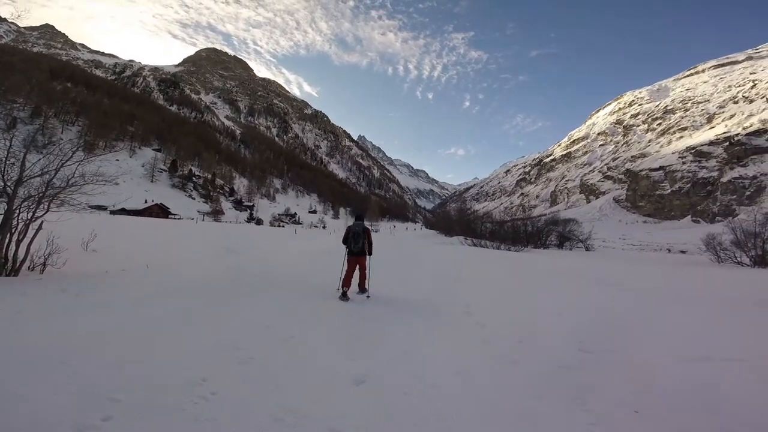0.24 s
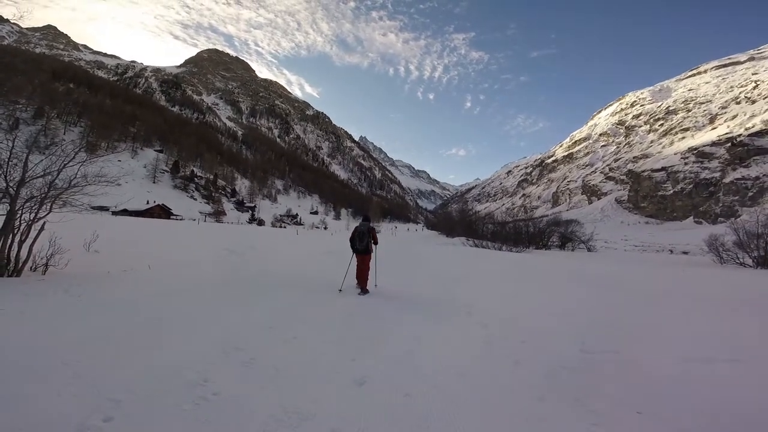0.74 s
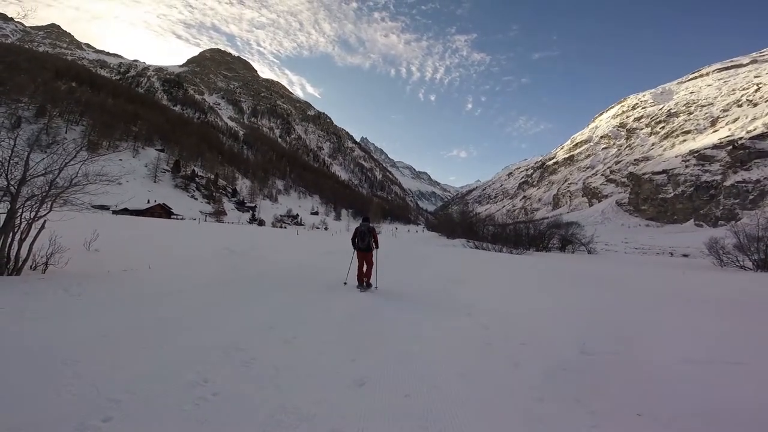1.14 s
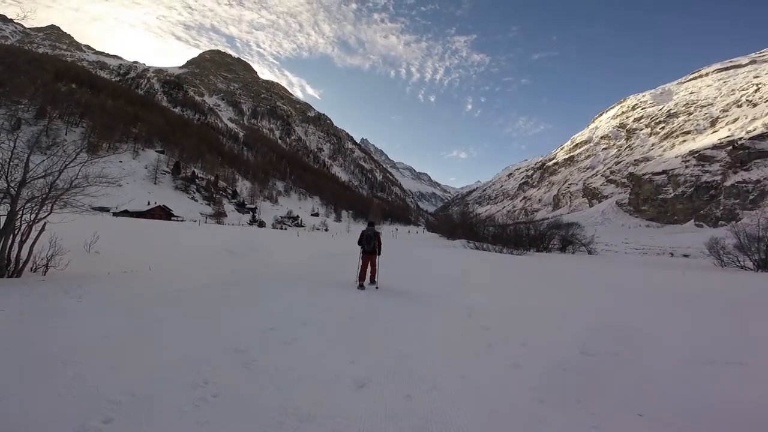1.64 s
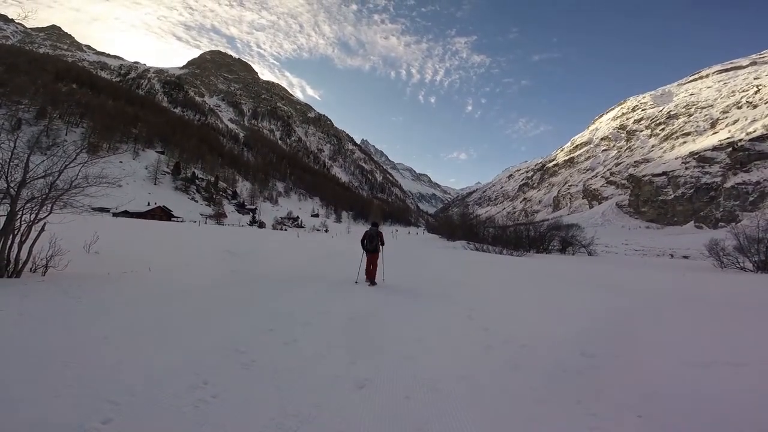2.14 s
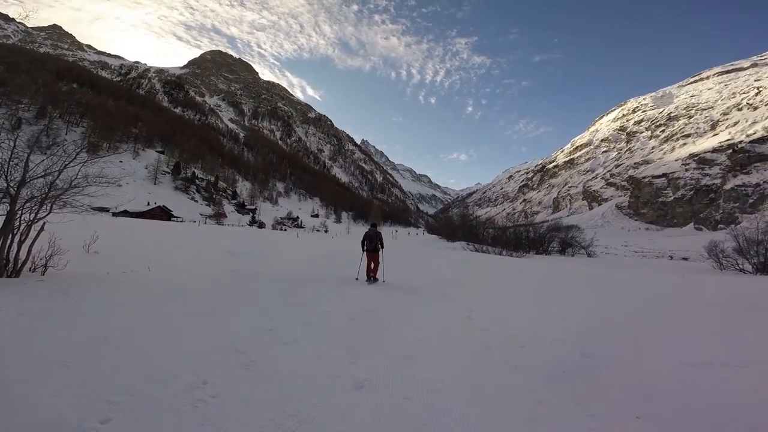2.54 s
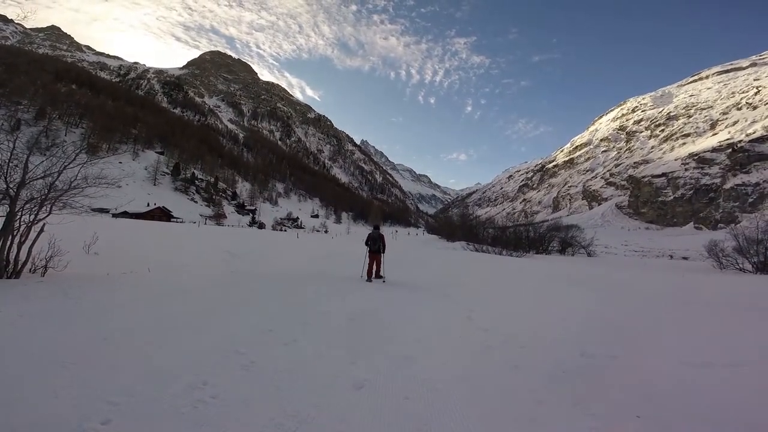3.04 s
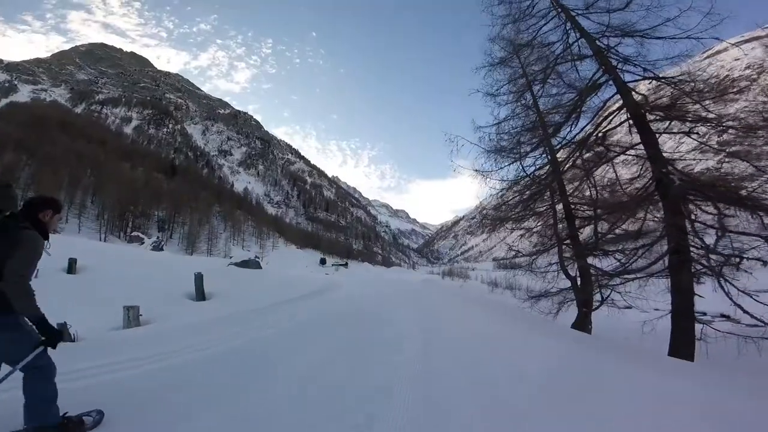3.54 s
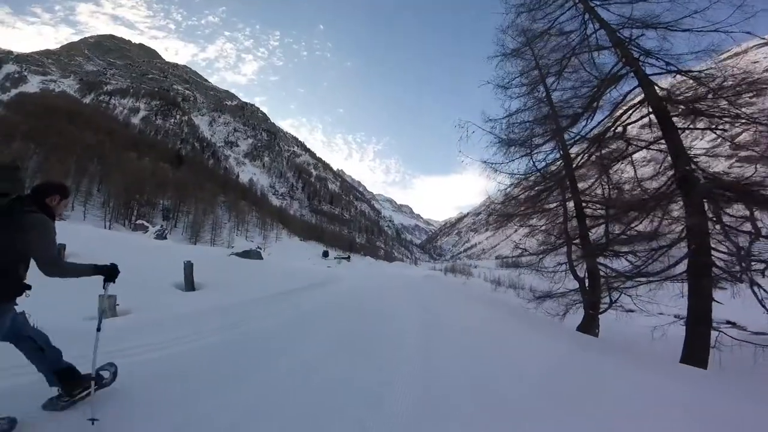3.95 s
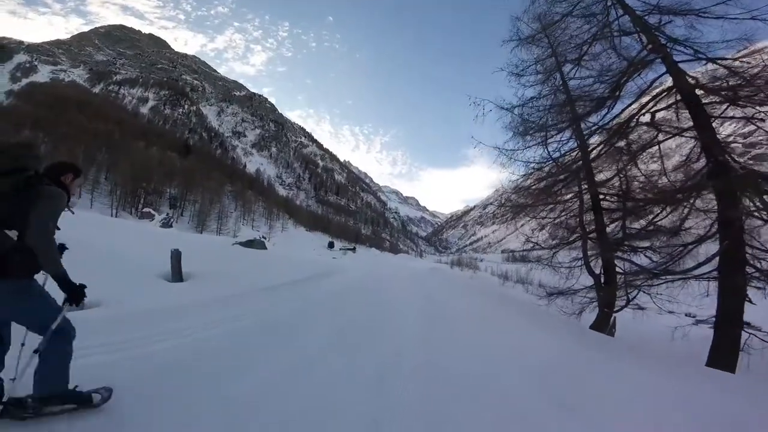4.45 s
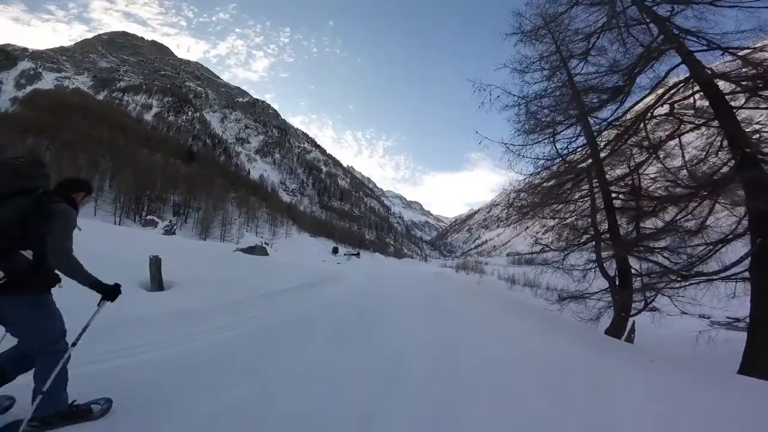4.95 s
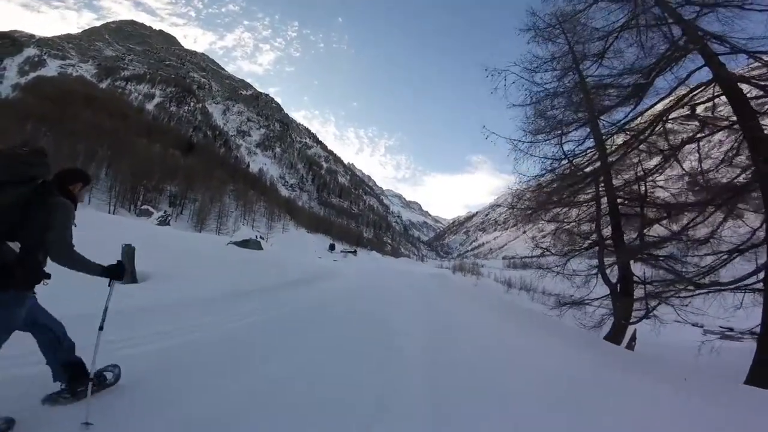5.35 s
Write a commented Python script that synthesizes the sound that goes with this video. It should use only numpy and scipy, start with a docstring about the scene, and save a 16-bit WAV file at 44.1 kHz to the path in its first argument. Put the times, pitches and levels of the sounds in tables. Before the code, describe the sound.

Outdoors on open packed snow, light snowshoe steps crunch and crackle at a slow walking pace, with pole snaps, claw scrapes and tiny icy ticks. Just after three seconds the sound cuts to heavy, coarse steps very near the microphone, with hollow cracks, bursting clods and a low puff of wind that soon fades. Dry, no echo, over a faint airy hiss.

```python
"""Light, crisp snowshoe steps with poles on packed snow; from about 3.2 s the steps are close and heavy.
Each tread is a swarm of filtered random clicks over hiss: coarse fractures crunch, fine ones crackle.
Frames and pole tips break the crust in short bursts; in the light steps claws scrape it.
Under it lies faint air (coloured noise); with the close steps a puff of low wind noise fades to a breeze."""
import sys
import numpy as np
from scipy import signal
from scipy.fft import rfft, irfft, next_fast_len
from scipy.io import wavfile

SR = 44100
rng = np.random.default_rng(int(sys.argv[2]) if len(sys.argv) > 2 else 0)


def wrap_up_sound(samples):
    """Save the sound to the file named by the first command line argument, as 16-bit audio."""
    columns = np.atleast_2d(samples).T
    # keep every value between -1 and 1, then stretch to whole-number steps
    tamed = np.clip(columns, -1, 1)
    steps = np.round(tamed * 32767).astype(np.int16)
    wavfile.write(sys.argv[1], SR, steps)


N = 247401
TIME_S = np.arange(N) / SR

# Spectra, relative: freq_hz, density_db (per Hz)
# still air of the valley
AIR_SPECTRUM = [(25, -13), (112, -25), (135, -7.5), (190, 4), (320, -13), (600, -8), (1900, -14.5),
                (4100, -26), (5500, -38), (6800, -19), (11500, -29.5), (15000, -36)]
# wind
WIND_SPECTRUM = [(15, -38), (35, -2.5), (120, -14), (200, -11), (600, -74)]
# one fracture, light steps
LIGHT_FRACTURE_SPECTRUM = [(150, 4.5), (290, -6.5), (480, -2.5), (850, -8.5), (1700, -9.5), (2700, -9.5),
                           (4300, -18), (5100, -5.5), (5700, -3.5), (6100, -13), (7000, -17.5),
                           (10200, -27.5), (11600, -50), (15000, -69)]
# one fracture, close steps
CLOSE_FRACTURE_SPECTRUM = [(100, -26.5), (160, 0), (400, -7.5), (800, -5.5), (1550, -9.5), (2700, -18),
                           (4450, -27.5), (5600, -12.5), (6700, -15), (7800, -24.5), (9400, -27),
                           (11400, -42.5), (15000, -51)]

# Levels of steps, snaps and scrapes are force levels; snaps() and scrapes() add coarse and fine offsets.
# light steps: full_weight_s, landing_db, full_weight_db
LIGHT_TREADS = [(0.24, -47, -39), (0.945, -52, -41.5), (1.64, -51.5, -43), (2.39, -57, -47),
                (3.06, -87, -43)]
# close steps: full_weight_s, landing_db, full_weight_db, push_off_db
CLOSE_TREADS = [(3.41, -35, -31.5, -70), (4.015, -31, -32, -39.5), (4.625, -34, -31.5, -39.5),
                (5.26, -36.5, -30, -38)]
# light phases (landing, full weight): after_full_weight_s, rise_s, fall_s, crackle_over_crunch_db
LIGHT_PHASES = [(-0.205, 0.056, 0.17, 5), (0, 0.062, 0.05, -2.5)]
# close phases (landing, full weight, push-off): after_full_weight_s, rise_s, fall_s, crackle_over_crunch_db
CLOSE_PHASES = [(-0.135, 0.048, 0.065, -8), (0, 0.11, 0.088, -11.5), (0.175, 0.11, 0.078, -9.5)]
# frame or pole tip breaks the crust, light: start_s, level_db, length_s
LIGHT_CRUST_SNAPS = [(0.035, -38.5, 0.018), (0.234, -43.5, .018), (0.3404, -39.5, 0.0095),
                     (0.4497, -36.5, 0.0071), (0.5393, -36, 0.0058), (0.6026, -35, 0.019),
                     (0.6845, -35.5, 0.011), (0.7305, -35, 0.003), (0.776, -39, 0.014),
                     (0.9402, -39.5, 0.0091), (1.1485, -38.5, 0.019), (1.313, -34.5, 0.023),
                     (1.430, -39.5, 0.018), (1.774, -45, 0.014), (1.9895, -42, 0.017), (2.1445, -41, 0.012),
                     (2.204, -41.5, 0.023), (2.2795, -41.5, 0.027), (2.400, -41.5, 0.0058),
                     (2.6145, -41, 0.0064), (2.7365, -37, 0.013), (2.9795, -39, 0.015), (3.112, -46, 0.052)]
# frame or pole tip breaks the crust, close: start_s, level_db, length_s, crackle_over_crunch_db
CLOSE_CRUST_SNAPS = [(3.2047, -33.5, 0.045, -21), (3.2318, -22.5, 0.0053, -12),
                     (3.2722, -26.5, 0.0092, -14), (3.322, -33.5, 0.05, -21), (3.546, -28.5, 0.0046, -17),
                     (3.65, -46.5, 0.15, -4), (3.6976, -29, 0.016, -20), (3.7472, -30.5, 0.027, -15),
                     (3.7833, -29.5, 0.02, -11), (3.8222, -29, 0.0073, -12), (3.8498, -18.5, 0.0061, -11.5),
                     (4.004, -30, 0.036, -9), (4.2204, -49, 0.02, 11), (4.278, -28, 0.016, -11.5),
                     (4.3119, -31, 0.01, -11), (4.3353, -25.5, .009, -17.5), (4.3812, -29.5, 0.016, -12),
                     (4.4365, -23.5, 0.019, -14), (4.4588, -24.5, 0.006, -6.5), (4.5113, -14, 0.0024, -8),
                     (4.5742, -43.5, 0.12, -2), (4.6873, -27, 0.012, -16.5), (4.752, -36.5, 0.012, -24),
                     (4.8985, -27.5, 0.012, -15), (4.9508, -30, 0.01, -14), (4.9886, -31.5, 0.032, -4.5),
                     (5.0275, -28.5, 0.011, -15), (5.0624, -32.5, 0.054, -7.5), (5.243, -32.5, 0.011, -21),
                     (5.3026, -31, 0.029, -18), (5.5281, -29, .014, -11), (5.5681, -27, 0.02, -16)]
# claws scrape the icy surface, mostly treble: middle_s, level_db, half_length_s
CLAW_SCRAPES = [(0.071, -54, .003), (0.446, -42, 0.017), (0.47, -41.5, .005), (0.5945, -34.5, 0.0046),
                (0.623, -36, 0.0031), (0.807, -30.5, 0.0016), (1.056, -43.5, 0.014), (1.187, -38.5, 0.0015),
                (1.29, -41, 0.017), (1.39, -40, 0.005), (1.4105, -33, 0.0029), (1.498, -35, 0.003),
                (1.867, -45, 0.019), (1.921, -43.5, 0.0034), (1.969, -41.5, 0.013), (2.016, -42, 0.0037),
                (2.13, -41.5, 0.011), (2.165, -43, 0.0048), (2.447, -44.5, .025), (2.528, -45, 0.013),
                (2.657, -45.5, 0.0098), (2.789, -43, .013), (2.908, -39.5, .011), (2.975, -45, 0.086)]

CLOSE_FROM_S, TAKEOVER_S = 3.205, 0.0015
EDGE_HZ = 15300
PUFF_DB, PUFF_FADE_DB_PER_S, BREEZE_DB = -38.5, 16, -61  # wind at the microphone
PHASE_SHAPE = 1.22  # 1 = pointed swell, 2 = rounded
CRACKLE_LAG_S = 0.0048  # fine grains keep slipping after the lumps have given way
SWELL_SHARE = 0.076  # part of a snap's length added to its build-up time
CRUNCH_TOP_HZ, CRACKLE_FROM_HZ = 1600, 4500


def gain_of(db):
    """Decibels to amplitude."""
    return 10 ** (np.asarray(db) / 20)


def evened(x):
    """Scales to rms 1."""
    return x / np.sqrt(np.mean(x ** 2) + 1e-20)


def band(x, lo_hz, hi_hz):
    """Keeps one band, with edges that add up flat to its neighbours."""
    size = next_fast_len(N + SR // 4)
    hz = np.fft.rfftfreq(size, 1 / SR)

    def below(edge_hz):
        return 1 / (1 + (hz / edge_hz) ** 12)

    return irfft(rfft(x, size) * (below(hi_hz) - below(lo_hz)), size)[:N]


def low_cut(x, hz, order):
    """Small, dry sources radiate little bass."""
    return signal.sosfilt(signal.butter(order, hz, "highpass", fs=SR, output="sos"), x)


def colour(x, spectrum, size=4096):
    """Minimum-phase filter with the given spectrum: each click starts sharply and rings briefly."""
    hz, db = np.transpose(spectrum)
    bin_hz = abs(np.fft.fftfreq(size, 1 / SR))
    log_gain = np.log(gain_of(np.interp(np.log(bin_hz + 1), np.log(hz), db)))
    ring = np.fft.ifft(np.exp(np.conj(signal.hilbert(log_gain)))).real
    return signal.oaconvolve(x, ring[:size // 2])[:N]


def wander(rate_hz):
    """Smooth chance of rms 1, up to the given rate."""
    return evened(band(rng.standard_normal(N), 1, rate_hz))


def air(level_db):
    """Still air: an even, faint rush of coloured noise."""
    return gain_of(level_db) * evened(colour(rng.standard_normal(N), AIR_SPECTRUM))


def wind():
    """A puff of low rumble that fades into a faint breeze."""
    age_s = np.maximum(TIME_S - CLOSE_FROM_S, 0)
    puff = gain_of(PUFF_DB - PUFF_FADE_DB_PER_S * age_s)
    rumble = evened(colour(rng.standard_normal(N), WIND_SPECTRUM))
    return np.hypot(puff, gain_of(BREEZE_DB)) * rumble


def fractures(per_s, spread_db, slip_hz, clump_db, powder):
    """Clicks of unequal size over a hiss of powder, clumped as the snow sticks and gives way."""
    size = gain_of(spread_db * np.minimum(rng.exponential(1, N), 3))
    clicks = (rng.random(N) < per_s / SR) * rng.choice([-1, 1], N) * size
    hiss = powder * rng.standard_normal(N)
    return (evened(clicks) + hiss) * gain_of(clump_db * wander(slip_hz))


def hollows(x, depth_db, width_hz, lasts_s, size=512):
    """Lumps of snow ring at pitches of their own: spectral peaks that come and go."""
    overlap = 3 * size // 4
    hz, s, z = signal.stft(x, SR, nperseg=size, noverlap=overlap)
    across = np.fft.fftfreq(len(hz), hz[1])[:, None]
    along = np.fft.fftfreq(len(s), s[1])
    smoothing = np.exp(-(across * width_hz) ** 2 - (along * lasts_s) ** 2)
    peaks = np.fft.ifft2(np.fft.fft2(rng.standard_normal(z.shape)) * smoothing).real
    shaped = z * gain_of(depth_db * evened(peaks))
    return signal.istft(shaped, SR, nperseg=size, noverlap=overlap)[1][:N]


def steadied(x, seconds):
    """The foot sets how much energy is released in each short while, however the grains fall."""
    window = signal.windows.hann(int(seconds * SR) + 3)
    power = abs(signal.oaconvolve(x ** 2, window / window.sum(), "same"))
    return x / np.sqrt(power + 1e-4 * np.mean(x ** 2))


def crush(drive, snow, coarse, fine, middle_db, fine_share, hollow_db, lumpy_db, steady_s):
    """Fractures sound low under the coarse force, high under the fine one, in between under both."""
    grains = colour(drive, snow)
    lumps = hollows(grains, hollow_db, width_hz=260, lasts_s=.028)
    low = band(lumps, 1, CRUNCH_TOP_HZ)
    middle = band(lumps, CRUNCH_TOP_HZ, CRACKLE_FROM_HZ)
    high = band(grains, CRACKLE_FROM_HZ, SR)
    # big lumps give way in their own rhythm
    coarse = coarse * gain_of(lumpy_db * wander(rate_hz=194))
    share = np.clip(fine_share, .05, .95)
    between = gain_of(middle_db) * coarse ** (1 - share) * fine ** share
    crunch = coarse * steadied(low, steady_s)
    crackle = fine * steadied(high, steady_s)
    return crunch + between * steadied(middle, steady_s) + crackle


def knock(x, hz, width_hz, db):
    """Snaps set the snowshoe's deck ringing: a broad, hollow resonance."""
    return x + gain_of(db) * signal.lfilter(*signal.iirpeak(hz, hz / width_hz, fs=SR), x)


def pops(per_s, lo_hz, hi_hz, cycles, spread_db):
    """Short rings at chance moments, each lasting a few cycles at a pitch of its own: larger pieces of snow
    letting go, or small metal ticks from the gear."""
    out = np.zeros(N)
    for when, pitch, size, sign in rng.random((int(per_s * N / SR), 4)):
        start = int(when * N)
        turns = TIME_S[:min(SR // 20, N - start)] * lo_hz * (hi_hz / lo_hz) ** pitch
        swell = 1 - np.exp(-2 * turns / cycles)
        ring = np.sin(2 * np.pi * turns) * np.exp(-turns / cycles) * swell
        out[start:start + len(ring)] += np.sign(sign - .5) * gain_of(spread_db * (2 * size - 1)) * ring
    return evened(out)


def scrapes(rows, coarse_db, fine_db):
    """A dragged claw swells and fades evenly: its coarse and fine force."""
    power = np.zeros(N)
    for middle_s, db, half_s in rows:
        distance = np.minimum(abs(TIME_S - middle_s) / half_s, 5)
        power += gain_of(db) ** 2 * np.exp(-2 * distance ** 2)
    return gain_of([[coarse_db], [fine_db]]) * np.sqrt(power)


def stray_snaps(force, per_s, over_db, spread_db, length_s):
    """Small chance breaks that follow the force on the snow: rows of start_s, level_db, length_s."""
    slot, size, span = rng.random((int(per_s * N / SR), 3)).T
    start_s = (np.arange(len(slot)) + slot) / per_s
    force_db = 20 * np.log10(np.interp(start_s, TIME_S, force))
    db = force_db + over_db + spread_db * (2 * size - 1)
    return list(zip(start_s, db, length_s * (.5 + span)))


def snaps(rows, coarse_db, fine_db, onset_s):
    """The crust yields, gives way and soon runs out: coarse and fine force of the bursts."""
    power = np.zeros((2, N))
    for start_s, db, length_s, *crackle_db in rows:  # the last column is optional
        near = (TIME_S > start_s) & (TIME_S < start_s + .1)
        age_s = TIME_S[near] - start_s
        # short snaps break at once, long ones swell as the first grains fail
        swell = 1 - np.exp(-age_s / (onset_s + SWELL_SHARE * length_s))
        shape = swell * np.exp(-(age_s / length_s) ** 2)
        levels_db = [[db + coarse_db], [db + fine_db + sum(crackle_db)]]
        power[:, near] += (gain_of(levels_db) * shape) ** 2
    return np.sqrt(power)


def tread(steps, gait, rest_coarse_db, rest_fine_db):
    """Coarse and fine force of steps that swell phase by phase; between them the decks only drag."""
    power = gain_of([[rest_coarse_db], [rest_fine_db]]) ** 2 * np.ones(N)
    for weight_s, *levels_db in steps:
        near = abs(TIME_S - weight_s) < .5
        for db, (after_s, rise_s, fall_s, crackle_db) in zip(levels_db, gait):
            age_s = TIME_S[near] - weight_s - after_s - np.array([[0], [CRACKLE_LAG_S]])
            swell = np.exp(-abs(age_s / np.where(age_s < 0, rise_s, fall_s)) ** PHASE_SHAPE)
            power[:, near] += (gain_of([[db], [db + crackle_db]]) * swell) ** 2
    return np.sqrt(power)


def light_steps():
    """Crisp, thin steps with a bright ring in the crackle and stray bright ticks."""
    pressed = fractures(per_s=2500, spread_db=0.5, slip_hz=144, clump_db=1.5, powder=0.66)
    broken = fractures(per_s=2400, spread_db=3.0, slip_hz=298, clump_db=-1.5, powder=0.33)
    broken = knock(broken, hz=560, width_hz=1800, db=7.5)
    coarse, fine = tread(LIGHT_TREADS, LIGHT_PHASES, rest_coarse_db=-55, rest_fine_db=-65)
    strays = stray_snaps(fine, per_s=27, over_db=7.5, spread_db=-3, length_s=0.0033)
    crust = snaps(LIGHT_CRUST_SNAPS, coarse_db=2, fine_db=-2.0, onset_s=0.00025)
    small = snaps(strays, coarse_db=-16, fine_db=1, onset_s=0.00084)
    claws = scrapes(CLAW_SCRAPES, coarse_db=-17.5, fine_db=-0.5)
    bursts = np.hypot(np.hypot(crust, small), claws)
    crunch = crush(pressed, LIGHT_FRACTURE_SPECTRUM, coarse, fine, middle_db=-5.5, fine_share=0.53,
                   hollow_db=3.5, lumpy_db=1.5, steady_s=0.13)
    cracks = crush(broken, LIGHT_FRACTURE_SPECTRUM, *bursts, middle_db=-6, fine_share=0.87,
                   hollow_db=4.0, lumpy_db=-2.0, steady_s=0.0094)
    # small bright ticks go on even while the foot is lifted
    ticks = pops(per_s=45, lo_hz=4950, hi_hz=5900, cycles=5, spread_db=7) * np.sqrt(fine)
    return low_cut(crunch + cracks + gain_of(-30.5) * ticks, hz=151.3, order=8)


def close_steps():
    """Heavy steps next to the microphone: coarse crunch and clods that burst under the deck."""
    pressed = fractures(per_s=1400, spread_db=0.5, slip_hz=117, clump_db=1.8, powder=0.82)
    broken = fractures(per_s=2200, spread_db=2.0, slip_hz=316, clump_db=0.0, powder=0.62)
    broken = knock(broken, hz=334, width_hz=490, db=17)
    coarse, fine = tread(CLOSE_TREADS, CLOSE_PHASES, rest_coarse_db=-49, rest_fine_db=-56)
    strays = stray_snaps(coarse, per_s=40, over_db=1, spread_db=1.5, length_s=0.0025)
    crust = snaps(CLOSE_CRUST_SNAPS, coarse_db=1.5, fine_db=0.3, onset_s=0.00032)
    small = snaps(strays, coarse_db=-4.0, fine_db=-10, onset_s=0.001)
    bursts = np.hypot(crust, small)
    crunch = crush(pressed, CLOSE_FRACTURE_SPECTRUM, coarse, fine, middle_db=1.0, fine_share=0.87,
                   hollow_db=3.0, lumpy_db=1.4, steady_s=0.23)
    cracks = crush(broken, CLOSE_FRACTURE_SPECTRUM, *bursts, middle_db=0.5, fine_share=0.73,
                   hollow_db=-1.5, lumpy_db=0, steady_s=0.014)
    clods = coarse * pops(per_s=110, lo_hz=230, hi_hz=1800, cycles=1.5, spread_db=7)
    return low_cut(crunch + cracks + gain_of(-3.5) * clods, hz=137, order=4)


def scene():
    """Open snow throws nothing back, so all is dry; close steps take over within a few milliseconds."""
    close = .5 + .5 * np.tanh((TIME_S - CLOSE_FROM_S) / TAKEOVER_S)
    far_part = (1 - close) * light_steps()
    close_part = close * (close_steps() + wind())
    return (far_part + close_part + air(level_db=-55.5))[None]


def record(dry):
    """The recorder's band limit: a linear-phase low-pass."""
    lowpass = signal.firwin(511, EDGE_HZ, window=("kaiser", 9), fs=SR)
    return signal.oaconvolve(dry, lowpass[None], "same")


dry = scene()
out = record(dry)
wrap_up_sound(out)
```